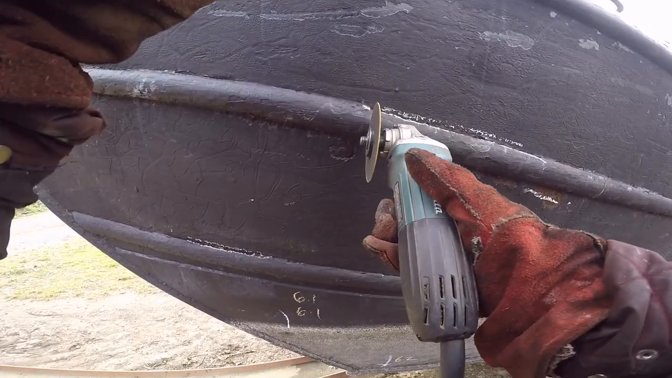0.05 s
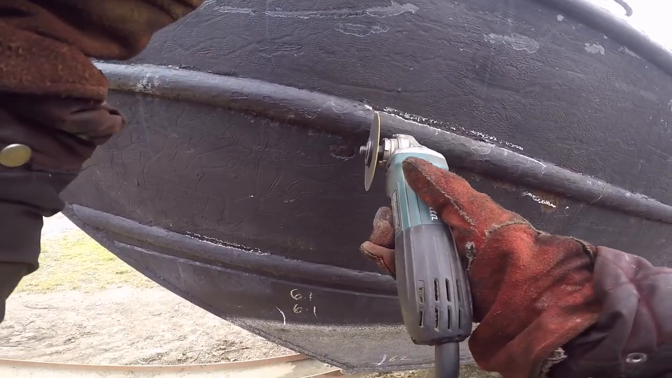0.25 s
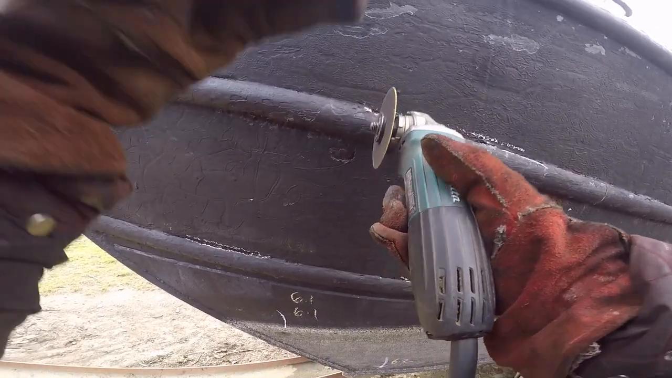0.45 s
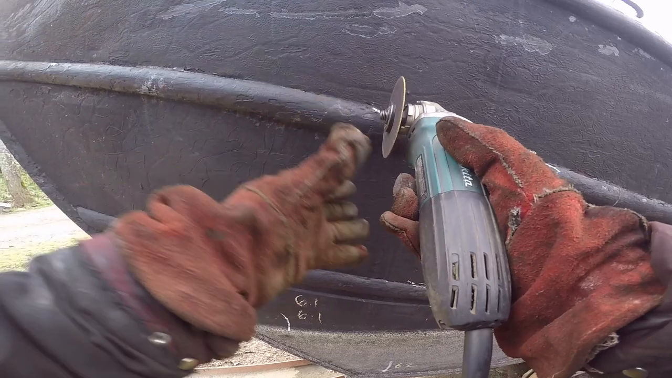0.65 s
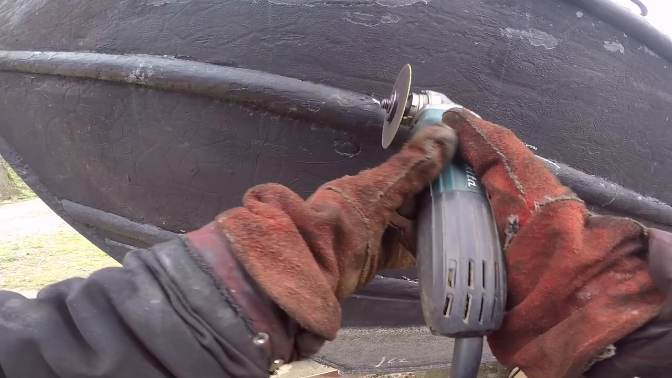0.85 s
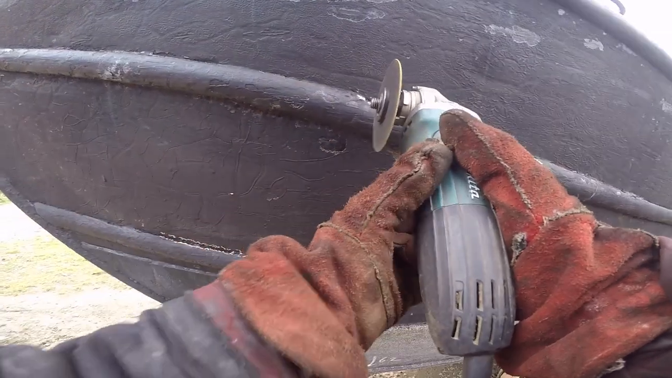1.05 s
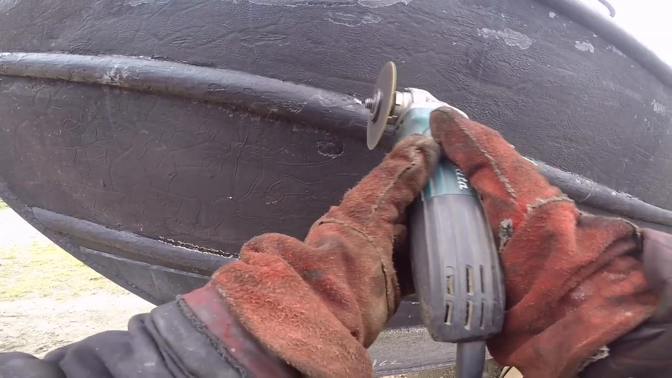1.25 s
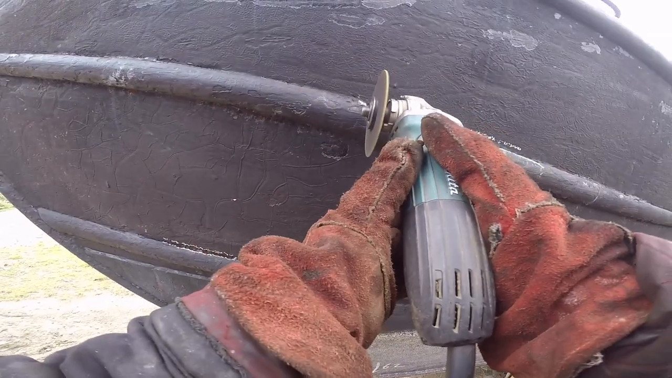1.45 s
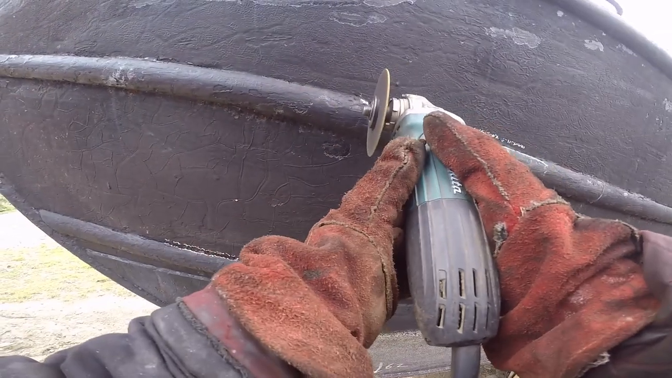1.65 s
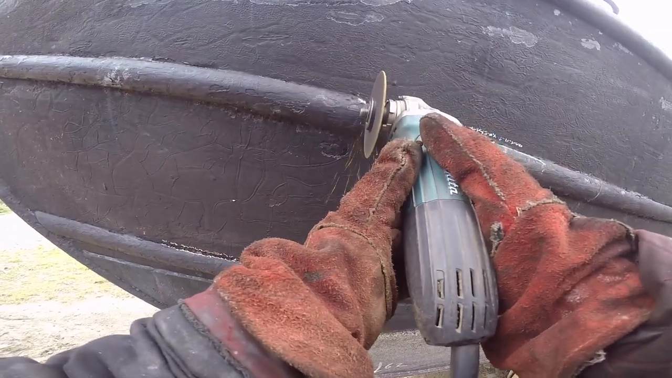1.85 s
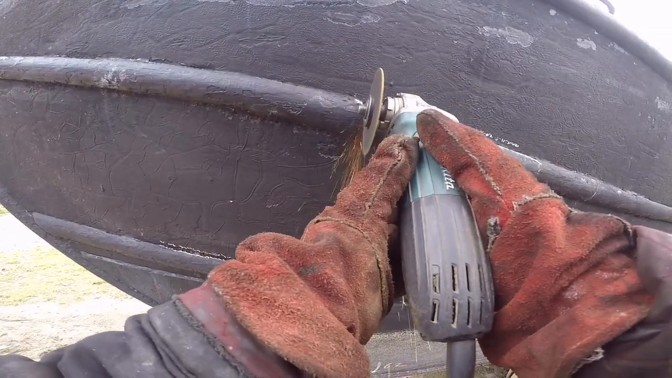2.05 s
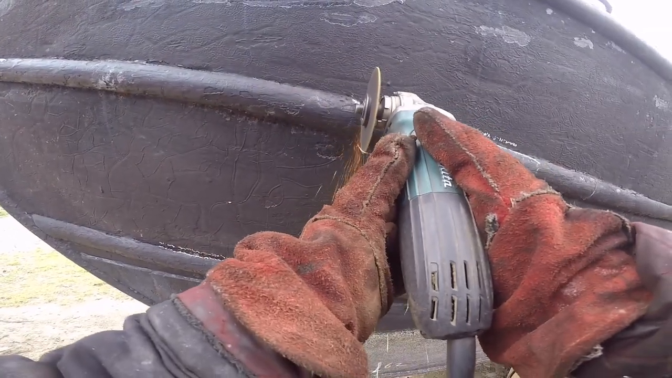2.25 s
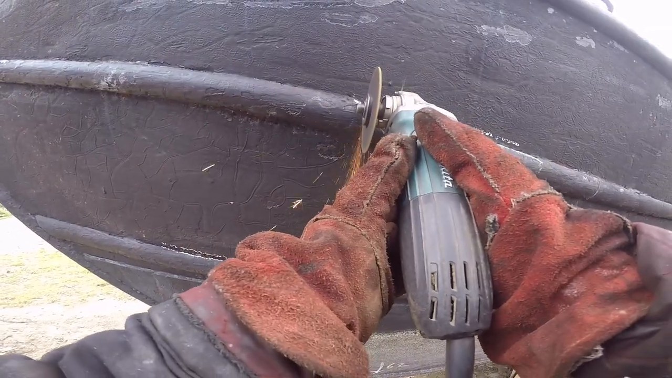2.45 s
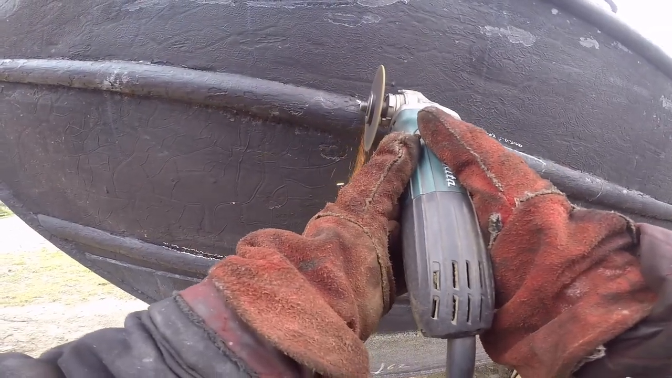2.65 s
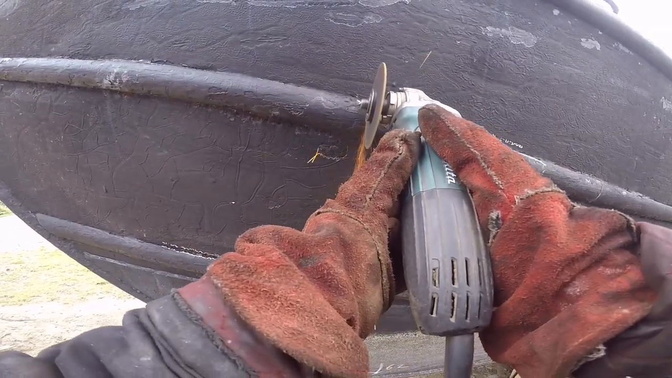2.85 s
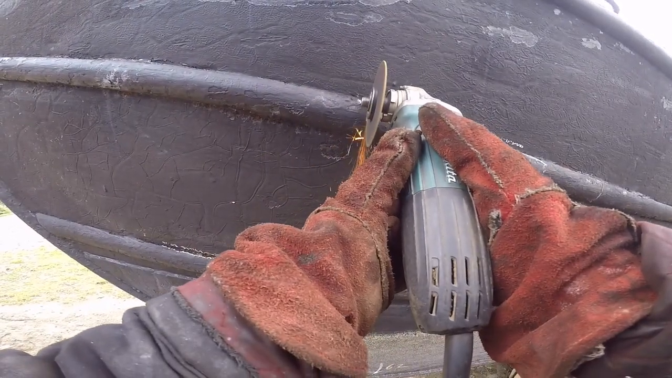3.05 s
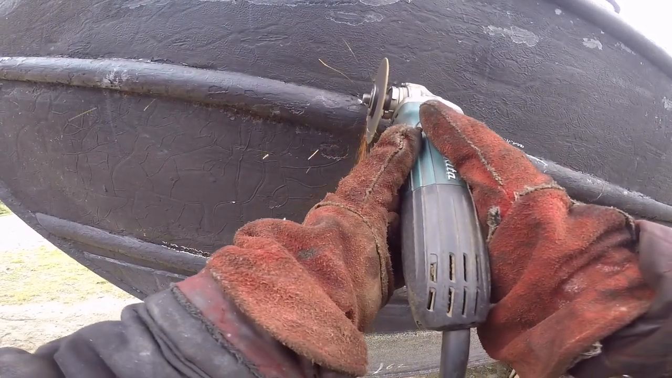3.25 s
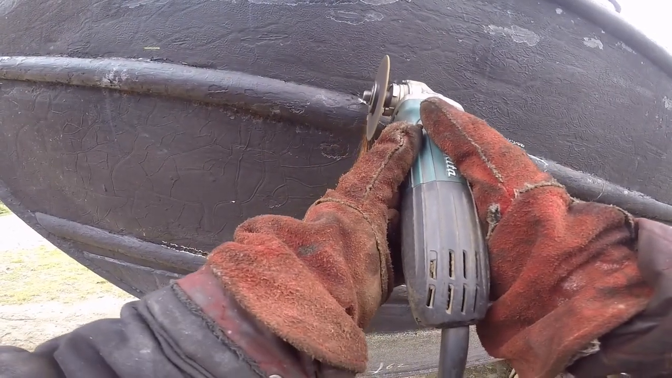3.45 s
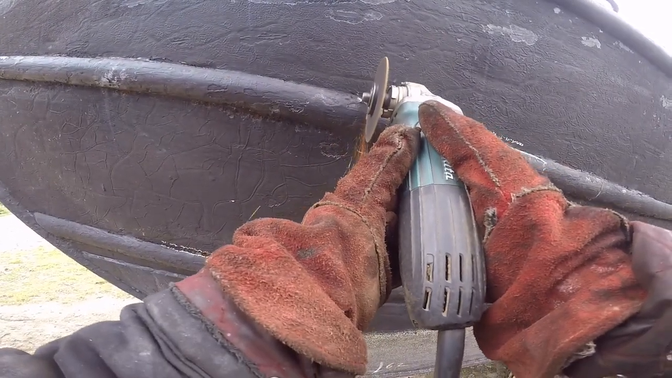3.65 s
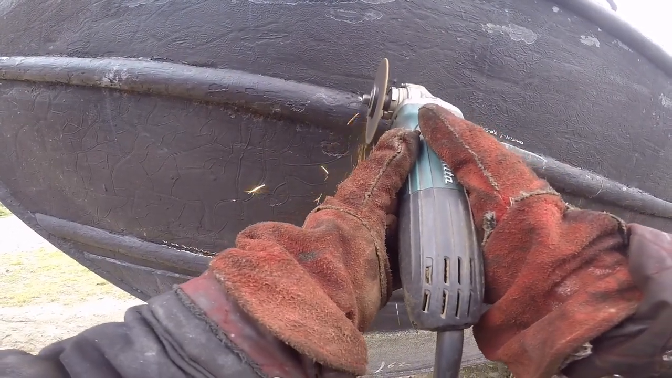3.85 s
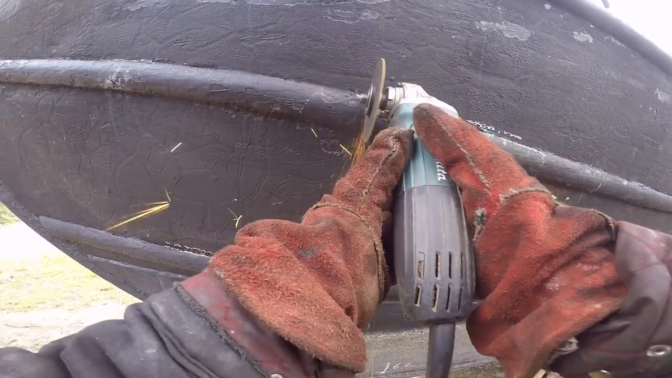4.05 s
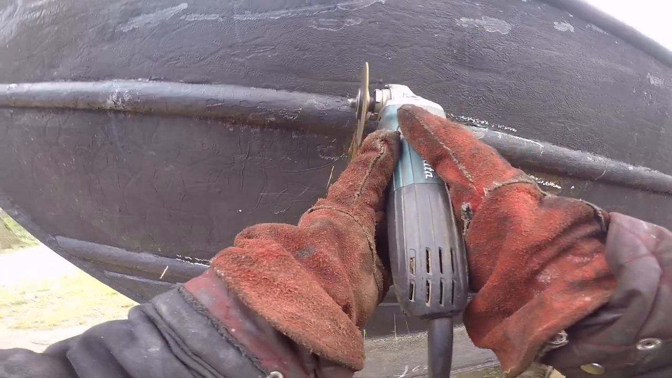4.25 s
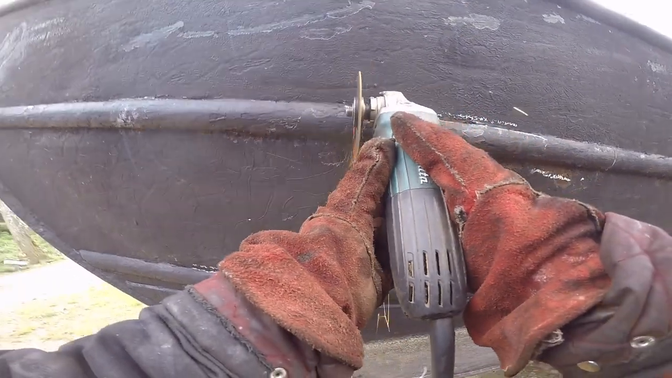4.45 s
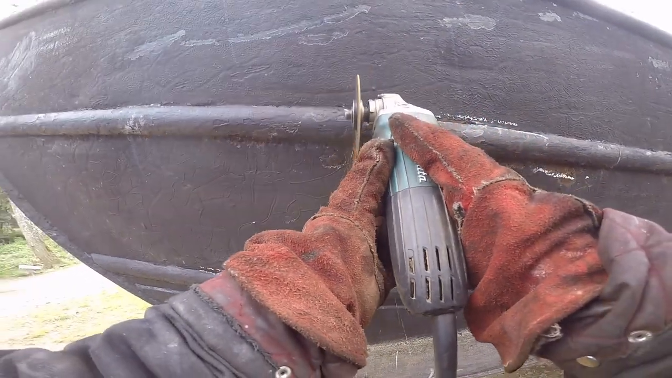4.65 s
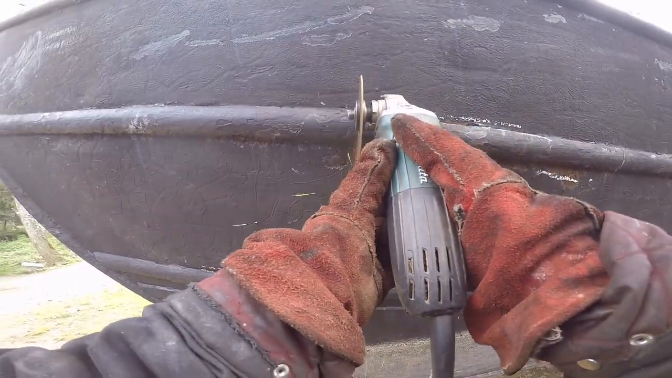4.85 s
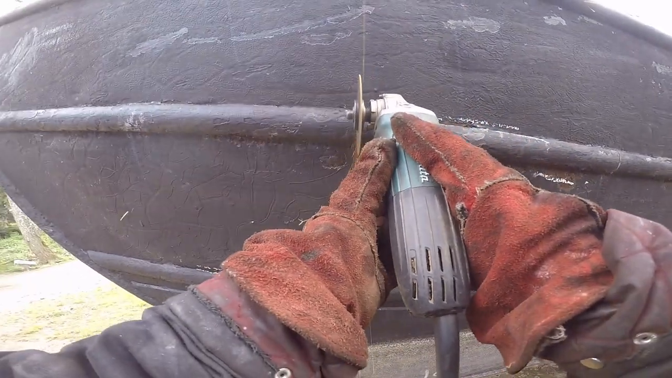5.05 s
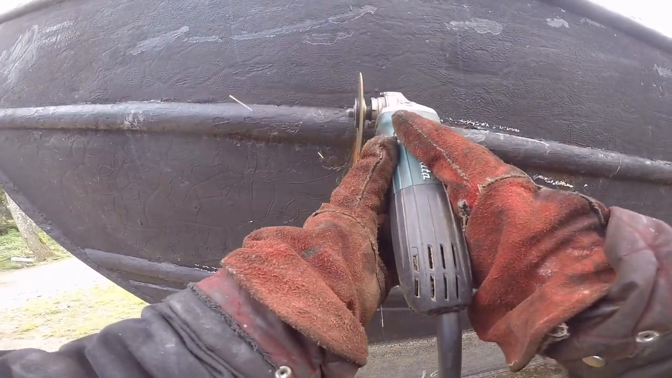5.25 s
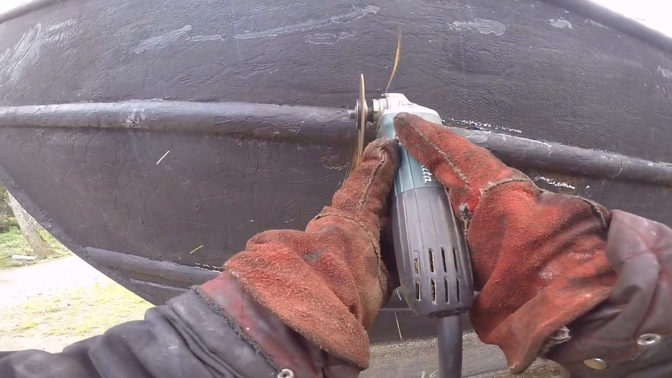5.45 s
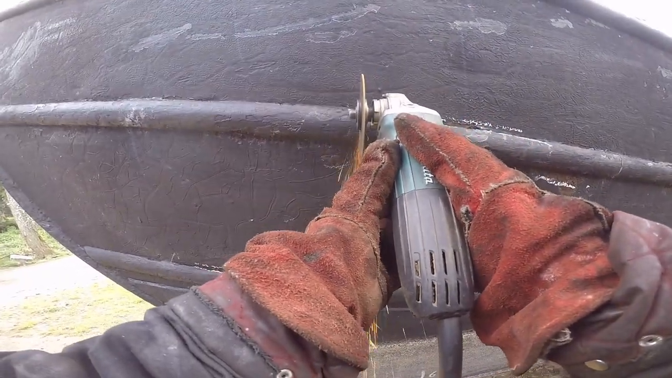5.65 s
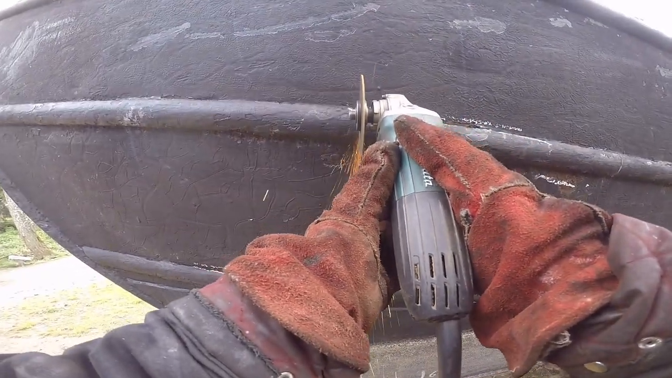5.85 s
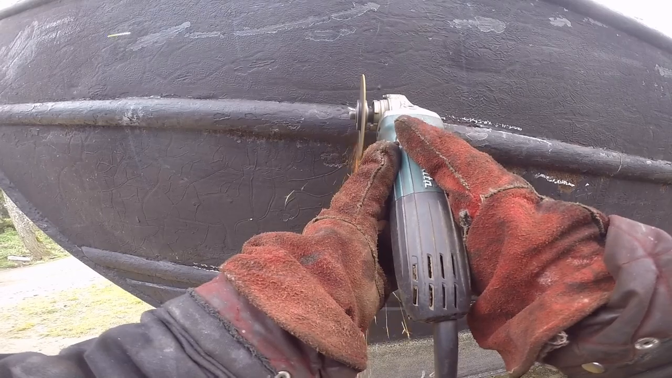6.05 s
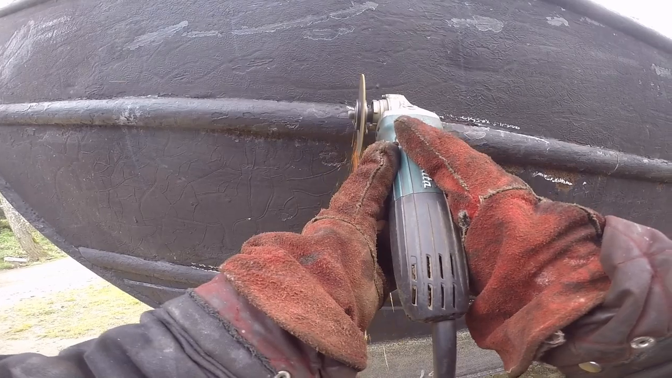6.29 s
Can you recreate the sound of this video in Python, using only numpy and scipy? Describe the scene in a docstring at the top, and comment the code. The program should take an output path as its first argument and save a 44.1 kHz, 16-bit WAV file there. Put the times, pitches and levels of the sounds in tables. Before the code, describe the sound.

Gloves rustle and bump, a switch clicks, an angle grinder rattles up to a high whine, then rasps harshly into a droning steel hull.

```python
"""Angle grinder cutting into a steel hull

Close to the microphone outdoors, cloth and glove noises precede a switch click; a fan-cooled motor spins up.
Torque pulses rattle its gears, rotor partials excite the casing, and noise in broad resonances gives fan air.
The disc then cuts a rail: random grain impacts excite disc and steel, and the hull plates drone.
Added load lowers the motor speed and dulls the whine; wind noise lies beneath."""
import sys
import numpy as np
from scipy import signal
from scipy.fft import rfft, irfft
from scipy.io import wavfile

SR = 44100
rng = np.random.default_rng(int(sys.argv[2]) if len(sys.argv) > 2 else 0)


def master_out(mix):
    """Clip the mix to full scale and print it as 16-bit PCM to the path in sys.argv[1]."""
    frames = np.transpose(np.atleast_2d(mix))
    ceiling = np.clip(frames, -1, 1)
    pcm = np.round(ceiling * 32767).astype(np.int16)
    wavfile.write(sys.argv[1], SR, pcm)


N = 278712
T = np.arange(N) / SR
FREQ = np.maximum(np.arange(N // 2 + 1) * SR / N, 1)

# wind spectrum at the microphone: (frequency [Hz], relative level [dB])
WIND_SPECTRUM = [(12, -13), (20, -1.5), (56, -5.5), (74, -1), (87, -13), (145, -9), (173, -21.5),
                 (400, -36.5), (520, -45), (880, -120)]
# gusts: (middle time [s], half length [s], level [dB])
GUSTS = [(.01, 0.032, -32.5), (.48, 0.12, -35), (1.15, .4, -35), (1.615, 0.045, -23.5), (1.72, 0.023, -20),
         (1.95, 0.074, -20), (4.6, .25, -37)]
# spectrum of rubbing cloth: (frequency [Hz], relative level [dB])
CLOTH_SPECTRUM = [(150, -61), (250, -29), (347, -13), (378, -5), (420, -1.5), (669, -3.5), (1530, -2.5),
                  (1700, -3), (2800, -4), (3330, -3.5), (7900, -22), (11400, -23.5), (15500, -35)]
# sleeve strokes: (middle time [s], half length [s], level [dB])
SLEEVE_STROKES = [(.17, 0.13, -45.5), (.43, 0.088, -45.5), (.71, 0.074, -48), (1.03, 0.044, -49.5)]
# glove bumps on the tool: (time [s], level [dB], centre [Hz], width [Hz], decay [s])
GLOVE_BUMPS = [(0.311, -44.5, 1150, 450, 0.018), (.417, -27.5, 1180, 1500, 0.0038),
               (.467, -44, 890, 900, 0.0073), (0.51, -33.5, 133, 91, 0.0085),
               (.805, -35.5, 167, 100, 0.035), (0.888, -44, 900, 1100, 0.0058)]
# switch resonances: (frequency [Hz], width [Hz], relative level [dB])
SWITCH_MODES = [(2060, 330, -6), (2680, 160, 5), (6130, 600, -2), (7500, 460, -6), (9700, 1000, -1),
                (12900, 900, -8)]
# fan, bearing and gear tones: (multiple of rotor speed [1], level running free [dB], level in the cut [dB])
ROTOR_TONES = [(1, -43, -53), (2, -50, -54), (2.9, -54, -45), (3.97, -41, -35), (4.17, -50, -40),
               (4.96, -45, -36), (9.67, -46, -41), (10.2, -38, -55), (11.6, -35, -44)]
# fan air spectrum: (frequency [Hz], relative level [dB])
FAN_SPECTRUM = [(120, -32), (200, -12.5), (253, -17), (333, -13.5), (399, -15.5), (715, -10), (812, -4),
                (1150, -11.5), (1560, -12), (3010, -0.5), (3890, -10), (5800, -8), (10600, -11.5),
                (14200, -5), (15500, -17)]
# whine partials: (multiple of rotor speed [1], relative level [dB])
WHINE_PARTIALS = [(30, 0), (26.3, -17)]
# casing resonances that the whine crosses: (frequency [Hz], width [Hz], gain [dB])
CASING_MODES = [(8900, 500, -34), (12670, 150, -15.5), (13760, 110, -19), (14220, 300, -11)]
# speed lost to the load of the cut: (time [s], speed loss [rotor turns/s])
SPEED_LOSS = [(1.92, 0), (2.25, 59), (2.62, 68), (2.95, 98), (3.25, 112), (3.55, 116), (3.83, 133),
              (4.23, 134), (4.46, 117), (5.36, 110), (5.72, 129), (6.32, 122)]
# gear housing resonances: (frequency [Hz], width [Hz], relative level [dB])
HOUSING_MODES = [(810, 360, -3.5), (1770, 200, -5.5), (2240, 160, 3), (2870, 230, 3.5), (3560, 100, -5),
                 (5630, 176, 1), (6440, 170, -10), (6880, 200, -8.5), (9050, 200, -20), (9900, 320, -22),
                 (12500, 2500, -29)]
# hull plate resonances: (frequency [Hz], width [Hz], relative level [dB])
HULL_MODES = [(90.5, 9.4, -6), (132, 4.8, -9), (142.5, 22, -3.5), (192, 18, -9), (221.8, 4.5, -5.5),
              (242, 17, -8.5), (258, 11, -7.5), (299.5, 15.6, -10.5), (330.8, 3.7, -10), (449, 30, -16),
              (500.4, 13.6, -16), (546, 30, -27), (609, 34, -18.5)]
# plate modes that keep singing: (mean frequency [Hz], relative level [dB])
SINGING_MODES = [(98, -12), (123, -8), (146, -5), (194, -19.5), (221, -14), (331, -15.5)]
# strength of the cut: (time [s], rasp level [dB], hull drone level [dB])
CUT_LEVELS = [(1.9, -15.5, -28.5), (2.2, -18.3, -25.5), (2.7, -17.5, -23), (4.1, -18, -25.5),
              (4.7, -20.5, -23), (5.4, -20.5, -23), (5.7, -18.5, -24), (6.05, -18.5, -21)]
# brief dips of the rasp: (middle time [s], half length [s], tone [Hz], tone [Hz], tone [Hz], tone level [dB])
RASP_DIPS = [(2.044, 0.012, 2870, 2540, 6400, -17.5), (2.169, 0.008, 2950, 2490, 5590, -16.5),
             (2.746, 0.012, 1910, 6440, 13500, -20.5), (3.877, 0.0088, 2450, 3830, 5600, -18.5),
             (4.237, 0.01, 2250, 12200, 5280, -20), (4.281, 0.013, 2240, 12409, 5233, -24.5)]
# snags of the disc on scale: (time [s], level [dB])
SNAGS = [(3.284, -21), (3.369, -18), (3.515, -22), (3.757, -15), (4.105, -18), (4.325, -13), (4.365, -16),
         (4.941, -22), (5.535, -17)]
# resonances excited by a snag: (frequency [Hz], width [Hz], relative level [dB])
SNAG_MODES = [(2600, 900, -7), (4260, 660, 12)]
# bands of coarse to fine grains: (low edge [Hz], high edge [Hz])
GRAIN_BANDS = [(0, 1600), (1600, 3400), (3400, 7000), (7000, 22050)]
# disc and steel resonances in a shallow groove: (frequency [Hz], width [Hz], relative level [dB])
SHALLOW_MODES = [(884, 124, -5.5), (1356, 24, -1), (1890, 260, -2), (2510, 290, 2), (2970, 114, 0.5),
                 (3770, 115, -3), (4290, 110, -8), (5460, 400, 0.5), (6390, 200, -3.5), (7200, 100, -4),
                 (7930, 170, -3.5), (8830, 320, -8), (9850, 300, -6), (11850, 310, -4.5),
                 (13000, 500, -4.5), (14700, 2000, -3.5)]
# disc and steel resonances in a deep groove: (frequency [Hz], width [Hz], relative level [dB])
DEEP_MODES = [(900, 170, -4.5), (1380, 140, -7), (1800, 150, -3), (2255, 150, 3.5), (2540, 280, -.5),
              (2950, 350, -2), (3750, 450, -8), (4500, 260, -6), (5500, 520, -4), (6300, 380, -9),
              (8080, 340, -6.5), (8940, 260, -8), (10130, 440, -6.5), (12450, 800, -6.5), (13500, 700, -7),
              (15200, 200, -8)]

# steady draught between gusts, and faint steady rubbing of the sleeves
DRAUGHT_DB, RUB_DB = -43, -57
# faint sinking tone: middle, half length, pitch at the middle, rate of fall, level
SINK_S, SINK_HALF_S, SINK_HZ, SINK_HZ_PER_S, SINK_DB = .8, .25, 365, 290, -57
# switch click; first current in the motor; mains frequency
SWITCH_S, POWER_S, MAINS_HZ = .9425, 1.0372, 50
# free speed [rotor turns/s], moment the rise counts from, time constant
FREE_HZ, SPIN_FROM_S, SPIN_UP_S = 582.8, 1.013, .429
# fan air: level running free, change in the cut, speed below which it dies away [rotor turns/s]
FAN_DB, FAN_CUT_DB, FAN_KNEE_HZ = -19, -5, 338
WHINE_CUT_DB = -7.5  # change of the whine in the cut
# gear knocks: level, change on every second one, scatter, fading time constant, knocks to full strength
KNOCK_DB, KNOCK_WEAK_DB, KNOCK_SCATTER_DB, KNOCK_FADE_S, KNOCKS_TO_FULL = -2.5, -2.5, .5, .28, 2
# gear rattle under full starting torque, and in the cut
RATTLE_DB, RATTLE_CUT_DB = -15, -38.5
# the disc first skims the rail and shakes the gears: moment, half length, level
SKIM_S, SKIM_HALF_S, SKIM_DB = 1.844, 0.12, -23
# the disc bites, then the groove deepens: start, time taken
BITE_S, BITE_TAKES_S = 1.733, 0.27
GROOVE_S, GROOVE_TAKES_S = 3.95, 0.76
DISC_GEARING = 3.8  # rotor turns in one disc turn
# high spot of the disc: extra level, share of the turn in which its bite decays
HIGH_SPOT_DB, HIGH_SPOT_SHARE = 5.5, .35
SPUTTER = .16  # amplitude of larger chips relative to the grit
# the whole level dips briefly: moment, half length, change
DIP_S, DIP_HALF_S, DIP_DB = 5.434, 0.018, -31.5
TOP_HZ = 15300  # upper band limit


def undb(db):
    """Decibels express amplitude gain logarithmically, 20 dB for a factor of ten."""
    return 10 ** (np.asarray(db) / 20)


def unit(x):
    """Normalization to rms 1 leaves the form of a signal unchanged."""
    return x / np.sqrt(np.mean(x ** 2))


def curve(rows, column=1):
    """Linear interpolation in time joins the values of one table column."""
    rows = np.asarray(rows, float)
    return np.interp(T, rows[:, 0], rows[:, column])


def ramp(start, length):
    """A uniform rise from 0 to 1 is clipped at both ends."""
    return np.clip((T - start) / length, 0, 1)


def swell(middle, half):
    """A Gaussian envelope reaches 1 at its middle."""
    return np.exp(-((T - middle) / half) ** 2)


def swells(rows, steady_db):
    """Uncorrelated contributions add in power: Gaussian swells over a steady level."""
    power = sum((undb(db) * swell(s, half)) ** 2 for s, half, db in rows)
    return np.sqrt(undb(steady_db) ** 2 + power)


def burst(start, decay):
    """An impact envelope rises at once and decays exponentially."""
    return (T >= start) * np.exp(-np.maximum(T - start, 0) / decay)


def phase(hz):
    """Phase is the time integral of angular frequency."""
    return 2 * np.pi * np.cumsum(hz) / SR


def noise():
    """White noise has equal mean power at every frequency."""
    return rng.standard_normal(N)


def walk(rate_hz):
    """Low-passed noise of rms 1 fluctuates little above the given rate."""
    return unit(irfft(rfft(noise()) / (1 + (FREQ / rate_hz) ** 4), N))


def spikes(rate_hz, spread_db, decay):
    """Random impacts at a mean rate, each decaying exponentially, form an envelope of rms 1."""
    size = undb(spread_db * np.minimum(rng.exponential(size=N), 4))
    hits = (rng.random(N) < rate_hz / SR) * size
    return unit(signal.lfilter([1], [1, -np.exp(-1 / (decay * SR))], hits))


def causal(x, gain):
    """A minimum-phase filter realizes a gain curve causally; rms-1 gain preserves white-noise power."""
    # folding the cepstrum onto positive times gives minimum phase
    cepstrum = irfft(np.log(unit(gain) + 1e-6), N)
    cepstrum[1:N // 2] *= 2
    cepstrum[N // 2 + 1:] = 0
    response = irfft(np.exp(rfft(cepstrum)), N)
    return signal.fftconvolve(x, response[:SR // 3])[:N]


def colour(x, points):
    """Spectral shaping follows a level curve interpolated over log frequency."""
    hz, db = np.transpose(points)
    return causal(x, undb(np.interp(np.log(FREQ), np.log(hz), db)))


def resonance(at_hz, modes):
    """Each damped mode passes most power near its own frequency; the modal powers add."""
    power = 0
    for hz, width, db in modes:
        detuning = (at_hz ** 2 - hz ** 2) / (at_hz * width)
        power = power + undb(db) ** 2 / (1 + detuning ** 2)
    return np.sqrt(power)


def ring(x, modes):
    """Modal filtering lets an excitation sound through a body's resonances."""
    return causal(x, resonance(FREQ, modes))


def wind():
    """Turbulence at the microphone gives mainly low-frequency noise, here gusts over a steady draught."""
    return colour(noise(), WIND_SPECTRUM) * swells(GUSTS, DRAUGHT_DB)


def sinking_tone():
    """A linearly falling frequency with random modulation gives a faint, unsteady glide."""
    steady_fall = SINK_HZ - SINK_HZ_PER_S * (T - SINK_S)
    hz = steady_fall * (1 + 0.024 * walk(rate_hz=60))
    level = undb(SINK_DB + 2 * walk(rate_hz=25)) * swell(SINK_S, SINK_HALF_S)
    return level * np.sin(phase(hz))


def cloth():
    """Fibre friction is noise with random amplitude modulation, swelling with each stroke."""
    fibres = unit(noise() * undb(2 * walk(rate_hz=1200) + 1.2 * walk(rate_hz=50)))
    return colour(fibres, CLOTH_SPECTRUM) * swells(SLEEVE_STROKES, RUB_DB)


def bumps():
    """Glove blows on the tool are short decaying bursts of narrow-band noise."""
    total = 0
    for s, db, hz, width, decay in GLOVE_BUMPS:
        padded = [(hz, width, 0)]
        # leather softens the blow: the resonance applied twice is steeper
        thud = unit(ring(ring(noise(), padded), padded))
        total = total + undb(db) * thud * burst(s, decay)
    return total


def switch():
    """A snap-over impact excites the resonances of the switch."""
    return undb(-23.0) * ring(noise() * burst(SWITCH_S, decay=0.002), SWITCH_MODES)


def spin_up():
    """Speed, as a share of free speed, levels off as drag catches up with torque."""
    return np.tanh(np.maximum(T - SPIN_FROM_S, 1 / SR) / SPIN_UP_S)


def torque():
    """Torque between 0 and 1 peaks twice in every mains cycle."""
    return np.cos(2 * np.pi * MAINS_HZ * (T - POWER_S)) ** 2


def rotor_tones(angle, load):
    """Periodic rotor forces give tones at multiples of the speed, with load-dependent levels."""
    total = 0
    for multiple, free_db, cut_db in ROTOR_TONES:
        level = undb(free_db + load * (cut_db - free_db) + 3.5 * walk(rate_hz=20))
        total = total + level * np.sin(multiple * angle)
    return total


def whine(speed, angle, load):
    """Rotor partials flutter with the torque and flare where they cross casing resonances."""
    flutter = unit((1 + .5 * torque()) * undb(2.1 * walk(rate_hz=230) + 1.8 * walk(rate_hz=14)))
    partials = 0
    for multiple, db in WHINE_PARTIALS:
        flare = resonance(multiple * speed, CASING_MODES)
        partials = partials + undb(db) * flare * np.sin(multiple * angle)
    return np.sqrt(2) * partials * flutter * undb(WHINE_CUT_DB * load)


def fan_air(speed, load):
    """Fan turbulence is broadband noise whose level and treble grow with rotor speed."""
    flow = undb(FAN_DB + FAN_CUT_DB * load) * speed ** 8 / (speed ** 8 + FAN_KNEE_HZ ** 8)
    air = colour(noise() * unit(1 + 0.16 * torque()), FAN_SPECTRUM) * flow
    dull = signal.sosfiltfilt(signal.butter(4, 7500, fs=SR, output="sos"), air)
    treble = air - dull
    return dull + treble * (speed / speed.max()) ** 2


def motor(speed, load):
    """Slight random frequency modulation of one rotor angle is shared by the tones and the whine."""
    angle = phase(speed * (1 + 0.0012 * walk(rate_hz=24.7) + 0.0029 * walk(rate_hz=225)))
    return rotor_tones(angle, load) + whine(speed, angle, load)


def knocking():
    """Each torque peak gives a knock, strong and weak in turn, building up and then fading."""
    age = np.maximum(T - POWER_S, 0)
    peak, since = np.divmod(age, 1 / (2 * MAINS_HZ))
    scatter = KNOCK_SCATTER_DB * noise()[peak.astype(int)]
    size = undb(KNOCK_DB + KNOCK_WEAK_DB * (peak % 2) + scatter)
    build = np.minimum((peak + 1) / KNOCKS_TO_FULL, 1)
    return (T >= POWER_S) * build * size * np.exp(-age / KNOCK_FADE_S - since / 0.0019)


def rattle(speed, load):
    """Gears thrown across their play strike once per rotor turn, most while speeding up."""
    turn, part = np.divmod(phase(speed) / (2 * np.pi), 1)
    size = undb(1.7 * rng.standard_normal(N))[turn.astype(int)] * (1 + 0.69 * torque())
    since = (part / speed * SR).astype(int)  # samples since the turn began
    # every turn strikes the same worn teeth, so part of the clatter repeats
    clatter = .5 * noise()[since] + noise()
    clatter = clatter * (0.16 + np.exp(-since / SR / 0.00035))
    acceleration = ramp(POWER_S, length=0.031) * (1 - spin_up() ** 2)
    shaking = undb(RATTLE_DB) * acceleration + undb(RATTLE_CUT_DB) * load
    shaking = shaking + undb(SKIM_DB) * swell(SKIM_S, SKIM_HALF_S)
    return unit(size * clatter) * shaking


def inrush_hum():
    """Starting current hums at twice and four times the mains frequency as it decays."""
    hum = np.sin(phase(np.full(N, 2. * MAINS_HZ)))
    hum = hum + 0.41 * np.sin(phase(np.full(N, 4. * MAINS_HZ)))
    return undb(-24.5) * burst(POWER_S, decay=0.31) * hum


def gears(speed, load):
    """Knocks and rattle excite the housing resonances; the inrush hum is added directly."""
    return ring(noise() * knocking() + rattle(speed, load), HOUSING_MODES) + inrush_hum()


def hull(load):
    """Forced vibration of the plates gives a resonant rumble and almost steady modal tones."""
    high_pass = signal.butter(4, 80, "high", fs=SR, output="sos")
    rumble = signal.sosfilt(high_pass, ring(noise(), HULL_MODES))
    song = 0
    for hz, db in SINGING_MODES:
        level = undb(db + 2 * walk(rate_hz=13.0))
        song = song + level * np.sin(phase(hz * (1 + 0.01833 * walk(rate_hz=9.75))))
    drone = unit(0.81 * unit(rumble) + np.sqrt(2) * song)
    return load * drone * undb(curve(CUT_LEVELS, column=2))


def rasp_dips():
    """The rasp dips briefly and thin tones sound in the gap: share of gear, cut and fan noise left, and tones."""
    share, tones = np.ones(N), np.zeros(N)
    for s, half, *pitches, db in RASP_DIPS:
        share *= 1 - .9 * swell(s, half)
        near = np.abs(T - s) < 6 * half
        t = T[near] - s
        chord = sum(np.sin(2 * np.pi * hz * t) / np.sqrt(k + 1) for k, hz in enumerate(pitches))
        tones[near] += undb(db) * np.exp(-(t / (1.2 * half)) ** 2) * chord
    return share, tones


def snags():
    """Sudden catches on scale are noise impulses that excite two resonances."""
    blows = sum(undb(db) * burst(s, decay=0.002) for s, db in SNAGS)
    return ring(noise() * blows, SNAG_MODES)


def grains():
    """Random grain impacts crackle in several bands, partly together and partly independently."""
    shared = spikes(rate_hz=870, spread_db=0.3, decay=0.0013)
    shared = shared + SPUTTER * spikes(rate_hz=60, spread_db=1, decay=.004)
    grit = 0
    for low, high in GRAIN_BANDS:
        own = spikes(rate_hz=420, spread_db=0.0, decay=0.00058)
        band = irfft(rfft(noise()) * (FREQ >= low) * (FREQ < high), N)
        grit = grit + band * (.4 + shared + .8 * own)
    return grit


def cutting(speed, load):
    """Contact pressure modulates the grain noise once per disc turn; resonances shift with groove depth."""
    disc_hz = speed / DISC_GEARING * (1 + .03 * walk(rate_hz=40))
    part_of_turn = phase(disc_hz) / (2 * np.pi) % 1
    pressure_db = HIGH_SPOT_DB * np.exp(-part_of_turn / HIGH_SPOT_SHARE) + 0.3 * torque()
    pressure_db = pressure_db + .4 * walk(rate_hz=140) + 0.6 * walk(rate_hz=9)
    grit = unit(grains() * undb(pressure_db))
    depth = np.clip(ramp(GROOVE_S, GROOVE_TAKES_S), .05, .9)
    shallow = ring(grit, SHALLOW_MODES)
    deep = ring(np.roll(grit, SR), DEEP_MODES)  # shifted by 1 s, so that the two are uncorrelated
    rasp = np.sqrt(1 - depth) * shallow + np.sqrt(depth) * deep
    return load * rasp * undb(curve(CUT_LEVELS)) + snags()


def scene():
    """Superposition of all sources, close and dry, under one brief dip in level."""
    speed = FREE_HZ * spin_up() - curve(SPEED_LOSS)
    load = ramp(BITE_S, BITE_TAKES_S)
    running = ramp(POWER_S, length=0.099)
    background = wind() + sinking_tone() + cloth() + bumps() + switch()
    share, thin_tones = rasp_dips()
    rough = gears(speed, load) + cutting(speed, load) + fan_air(speed, load)
    grinder = share * rough + running * motor(speed, load) + thin_tones + hull(load)
    dip = undb(DIP_DB * swell(DIP_S, DIP_HALF_S))
    return ((grinder + background) * dip)[None]


def record(dry):
    """Smooth saturation rounds off peaks near full scale; a steep low-pass limits the band."""
    held = dry / (1 + dry ** 6) ** (1 / 6)
    return signal.sosfilt(signal.ellip(12, .2, 80, TOP_HZ, fs=SR, output="sos"), held)


dry = scene()
out = record(dry)
master_out(out)
```